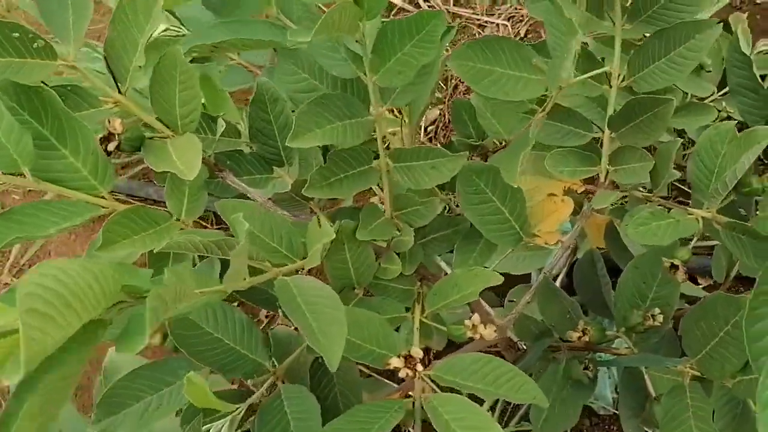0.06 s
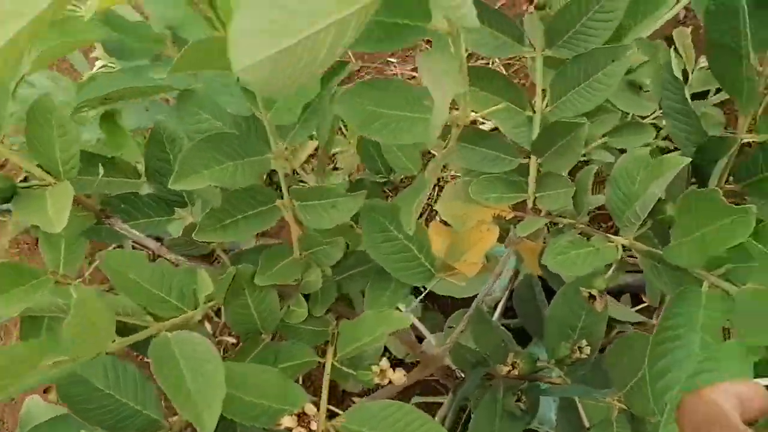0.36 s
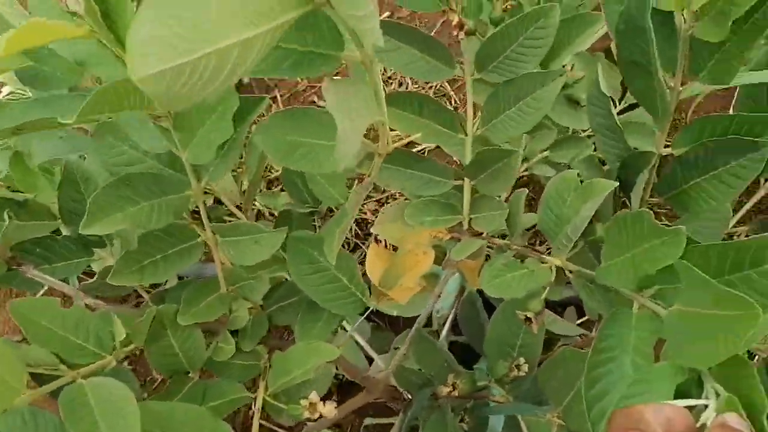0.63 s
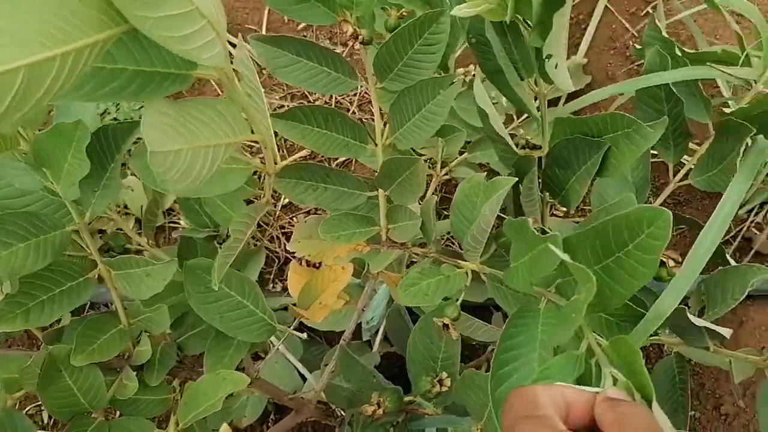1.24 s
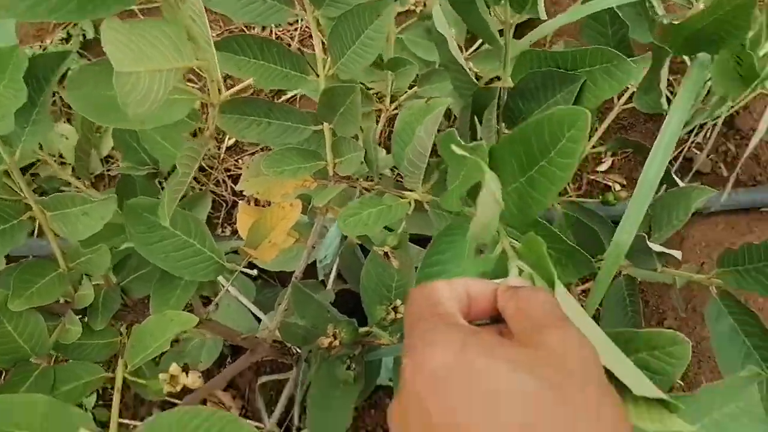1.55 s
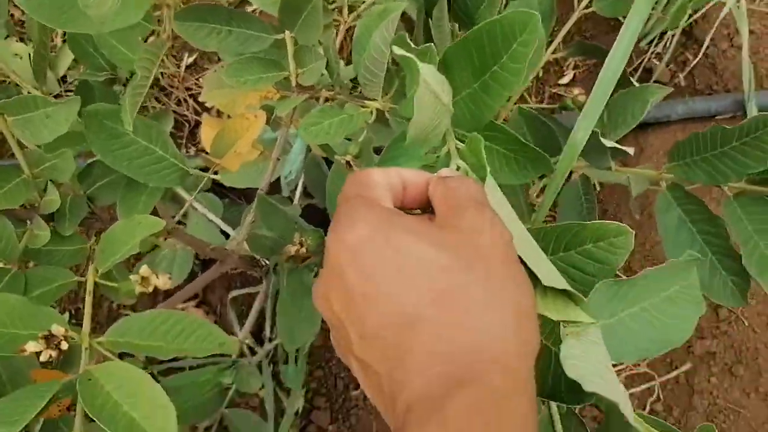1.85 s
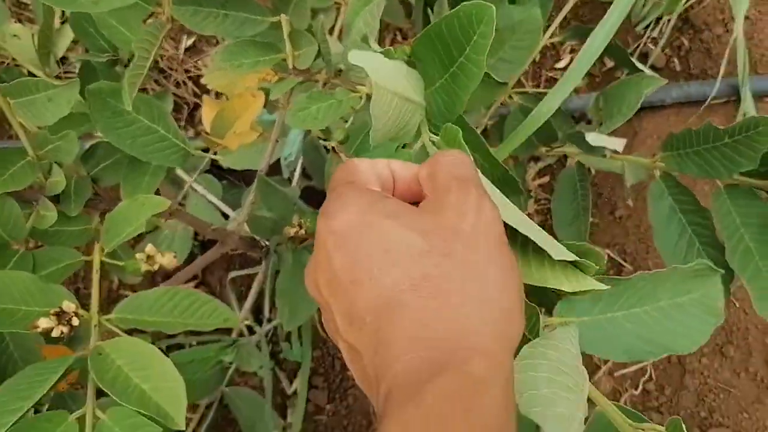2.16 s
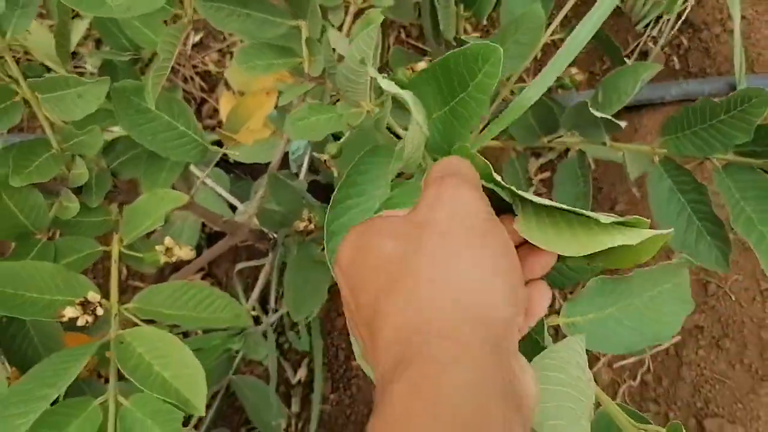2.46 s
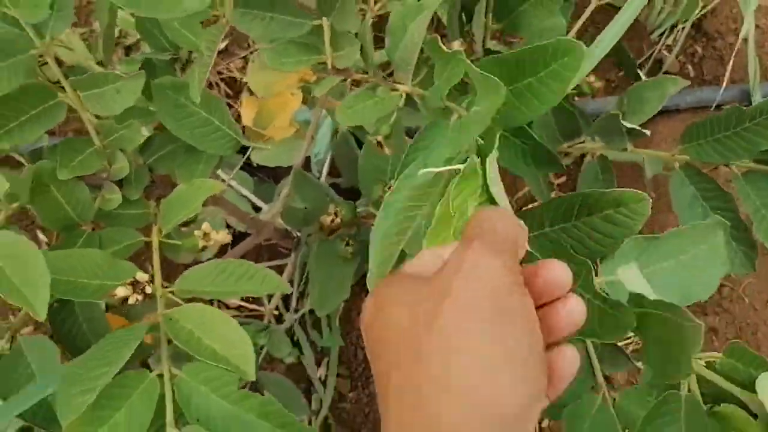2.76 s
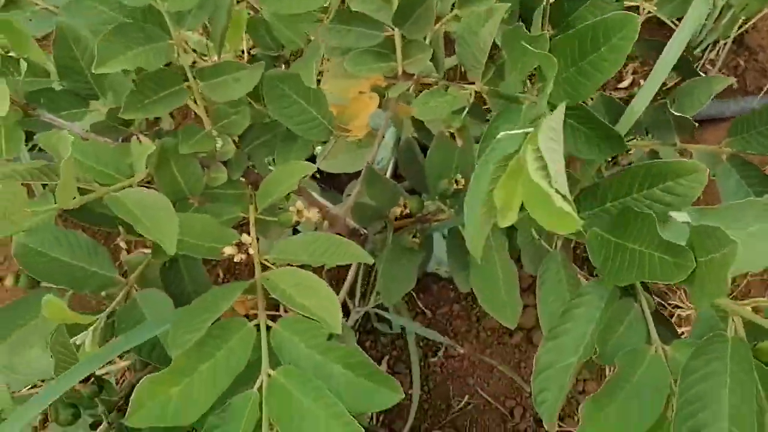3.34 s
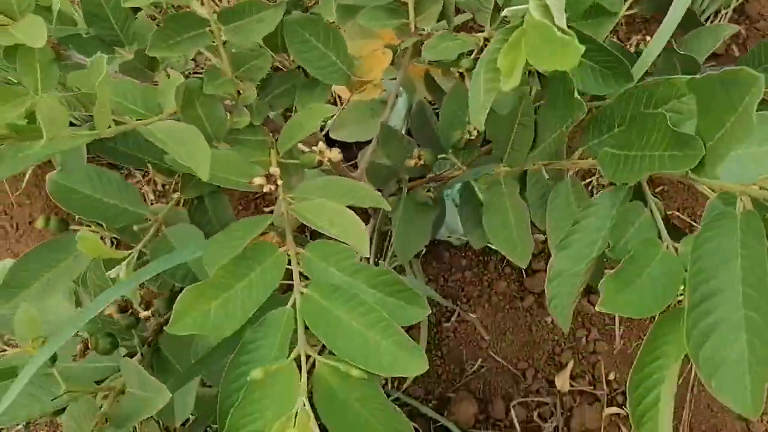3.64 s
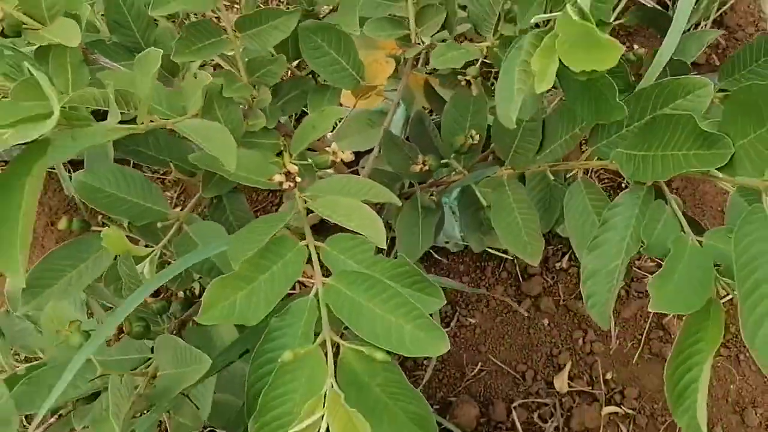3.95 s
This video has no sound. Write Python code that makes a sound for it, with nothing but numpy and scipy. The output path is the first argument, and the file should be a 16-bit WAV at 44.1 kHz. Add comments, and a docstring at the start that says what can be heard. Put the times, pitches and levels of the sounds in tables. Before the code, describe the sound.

Low wind buffeting and popping, with light leaf rustle and one sharp stem snap.

```python
"""From the start a breeze sweeps eddies over the two ports of a hand-held microphone, which rumble and
pop; faint far calls, probably birds, come and go in the soft hiss of a field. From about 1 s a hand
slides into a shrub, and the leaves rub and tick. At 2.6 s a bent shoot snaps and its fibres tear.
The branch then rustles back and settles with two soft swishes as the breeze slackens."""
import sys
import numpy as np
from scipy import signal
from scipy.fft import rfft, irfft
from scipy.io import wavfile
from scipy.ndimage import uniform_filter1d, map_coordinates

SR = 44100
rng = np.random.default_rng(int(sys.argv[2]) if len(sys.argv) > 2 else 0)


def to_wav(sig):
    """Store sig (one row per channel, or 1-D mono) as 16-bit WAV at the path in sys.argv[1].

    Samples outside -1..1 are clipped; the rate is SR.
    """
    pcm = np.clip(np.atleast_2d(sig), -1, 1) * 32767
    pcm = np.round(pcm).astype(np.int16)
    wavfile.write(sys.argv[1], SR, pcm.T)  # frames by channels


N = 176400

# gusts at each port (time [s], strength [dB])
GUST_LEFT = [(0.0, -39), (0.045, -25), (0.08, -46), (0.15, -35), (0.2, -34), (0.25, -52.5), (0.39, -34),
             (0.45, -39), (0.55, -36), (0.58, -19), (0.62, -32.5), (0.655, -24.5), (0.69, -36.5),
             (0.82, -26.5), (0.87, -27.5), (0.9, -43), (1.06, -46), (1.1, -33), (1.15, -38.5),
             (1.21, -28.5), (1.24, -47.5), (1.29, -23), (1.34, -38), (1.41, -19.5), (1.48, -46.5),
             (1.555, -30.5), (1.68, -56.5), (1.81, -39.5), (2.2, -53), (2.45, -39), (2.6, -52), (2.7, -34),
             (2.76, -53), (2.91, -68), (3.5, -75.5), (4.0, -67)]
GUST_RIGHT = [(0.0, -26), (0.12, -35), (0.165, -24), (0.3, -40), (0.33, -60.5), (0.4, -24), (0.44, -22),
              (0.47, -34.5), (0.5, -24), (0.525, -36.5), (0.585, -22), (0.63, -42), (0.71, -34.5),
              (0.738, -17), (0.765, -30), (0.805, -29), (0.84, -47), (0.96, -45.5), (0.99, -28),
              (1.03, -49), (1.06, -33), (1.12, -47), (1.2, -48), (1.22, -32), (1.26, -39), (1.345, -23),
              (1.44, -70), (1.53, -66.5), (1.57, -27.5), (1.6, -31), (1.69, -26), (1.75, -46), (1.89, -33),
              (1.95, -41.5), (2.01, -22.5), (2.06, -36.5), (2.26, -41.5), (2.3, -25.5), (2.36, -30),
              (2.385, -22), (2.41, -26), (2.49, -19.5), (2.52, -24), (2.615, -23), (2.69, -39.5),
              (2.78, -33), (2.83, -42), (2.935, -28), (3.0, -63), (3.075, -25), (3.22, -47.5), (3.34, -29),
              (3.49, -80), (3.64, -43.5), (3.75, -76.5), (3.82, -46.5), (3.93, -38), (4.0, -56)]
# mean flow (time [s], relative speed [ratio])
BREEZE_SPEED = [(2.65, 1), (3.1, .76)]
# eddy pressure at unit speed (frequency [Hz], relative level [dB])
EDDY_SPECTRUM = [(20, 3.5), (110, 3.5), (200, 3), (300, -2.5), (500, -16), (700, -29), (1000, -42.5),
                 (1500, -70.5), (3000, -86)]
def wind(gust, level_db, cut_hz):
    """Frozen turbulence: a stronger gust carries eddies past a port faster, so brighter and louder."""
    reference_db, db_per_doubling, loudness_exponent = -26, 21, 0.51
    flutter_db, flutter_hz = 1.5, 130
    lull_db, flaps_per_s = -9.5, 40
    strength_db = curve(gust) - reference_db + flutter_db * drift(flutter_hz)
    speed = curve(BREEZE_SPEED) * 2 ** (strength_db / db_per_doubling)
    # the flow breaks away in quick uneven flaps, with lulls between
    flap_hz = flaps_per_s * 2 ** np.tanh(drift(flutter_hz))
    lull = np.maximum(np.sin(2 * np.pi * np.cumsum(flap_hz) / SR), 0) ** 2
    eddies = unit_rms(colour(rng.standard_normal(N), EDDY_SPECTRUM))
    local_power = uniform_filter1d(uniform_filter1d(eddies ** 2, size=450), size=450)
    pressure = sweep(eddies / np.sqrt(local_power), speed)
    pressure *= unit_rms(gain(lull_db * lull)) * gain(level_db + loudness_exponent * strength_db)
    bass_cut = signal.butter(1, cut_hz, "high", fs=SR, output="sos")
    return signal.sosfilt(bass_cut, pressure)


# single sharp eddies (time [s], peak level [dB], centre frequency [Hz], port [left or right])
VORTICES = [(0.042, -11.5, 300, "left"), (0.22, -21.5, 396, "right"), (.402, -15, 330, "right"),
            (0.59, -16.5, 650, "left"), (0.771, -19, 320, "right"), (0.814, -9, 230, "left"),
            (.86, -14, 410, "left"), (1.021, -31, 410, "left"), (1.342, -24.5, 605, "right"),
            (1.427, -25, 430, "left"), (1.7, -21, 390, "right"), (2.463, -17.5, 397, "right"),
            (2.657, -12, 280, "right"), (2.751, -16.5, 253, "right")]
def vortex_pops():
    """Pressure drop in a vortex: its core pulls a brief suction pulse from the port it crosses."""
    t, out = np.arange(N) / SR, np.zeros((2, N))
    for time, db, hz, port in VORTICES:
        radius_squared = (np.pi * hz * (t - time)) ** 2
        pulse = (2 * radius_squared - 1) * np.exp(-radius_squared)
        out[["left", "right"].index(port)] += gain(db) * pulse
    return out


# cracks of stem and leaf stalks (time [s], relative level [dB], decay [s], left minus right [dB])
CRACKS = [(1.5483, -46.5, 0.0016, 6), (1.9649, -38.5, 0.001, -16), (2.6174, -29, 0.0023, -6),
          (2.643, -36, 0.0011, 3), (2.693, -42.5, 0.0029, 0), (3.008, -44, 0.001, 3),
          (3.857, -45, 0.0011, -6)]
# breaking green wood (frequency [Hz], gain [dB])
STEM_SPECTRUM = [(600, -20), (1700, -4), (2900, -4), (3900, -17), (5000, -6), (7200, 0), (8200, -7),
                 (9800, -13), (11200, -26), (15000, -30)]
def breaking_stem():
    """Fracture: stored strain is released in sudden cracks, and bark tears fibre by fibre."""
    burst = stereo(np.sign(rng.standard_normal((3, N))))
    cracks = burst * sum(gain(db) * decay(time, fall) * pan(side) for time, db, fall, side in CRACKS)
    tear_start_s, attack_s, decay_s = 2.623, 0.009, 0.028
    age = np.maximum(np.arange(N) / SR - tear_start_s, 0)
    pull = np.minimum(age / attack_s, 1) * np.exp(-np.maximum(age - attack_s, 0) / decay_s)
    fibres = grains(per_s=2000) * pull * gain(-42.5) * pan(-4.5)
    return 2 * colour(cracks + fibres, STEM_SPECTRUM)


# leaves rubbing (time [s], level [dB])
RUSTLE_LEVEL = [(0, -79.5), (.44, -67.5), (.55, -94.5), (1.03, -74), (1.09, -62.5), (1.19, -63),
                (1.265, -53.5), (1.36, -72), (1.56, -68), (1.72, -70.5), (1.76, -63), (1.8, -64),
                (1.92, -66), (2.03, -72.5), (2.61, -77.5), (2.66, -51.5), (2.73, -57), (3.03, -58.5),
                (3.1, -70), (4, -69)]
# leaf contacts (frequency [Hz], relative level [dB])
LEAF_SPECTRUM = [(700, -9), (1700, -2), (3000, 8), (4000, -6), (5400, 2.5), (7300, 5), (8300, -8),
                 (10000, -13), (11300, -18), (15000, -20)]
# the branch settling (centre time [s], length [s], frequency [Hz], level [dB])
SWISHES = [(3.25, 0.21, 4260, -68), (3.56, 0.17, 5180, -67)]
def rustling_leaves():
    """Stick-slip friction: leaves catch and slip in dense tiny contacts, then swish as they settle."""
    contacts = unit_rms(colour(grains(per_s=1900), LEAF_SPECTRUM))
    level_db = curve(RUSTLE_LEVEL) + 1.2 * drift(80)
    return (contacts * gain(level_db) + swells(SWISHES, width_hz=790)) * pan(-6)


# leaf tips striking each other (time [s], relative level [dB], resonance [Hz])
LEAF_FLICKS = [(1.071, -41, 2790), (1.9622, -46, 4900), (3.167, -37.5, 3430)]
def leaf_flicks():
    """Damped resonance: a struck leaf ticks with a short ring."""
    out = 0
    for time, db, hz in LEAF_FLICKS:
        tick = np.sign(rng.standard_normal(N)) * decay(time, decay_s=.003)
        out += gain(db) * resonate(tick, hz, q=7)
    return 4 * out * pan(-22)


# far calls (centre time [s], length [s], pitch [Hz], level [dB])
FAR_CALLS = [(.09, 0.15, 1830, -63.5), (0.991, 0.087, 2390, -61.5), (2.179, 0.15, 1894, -60.5),
             (3.25, 0.11, 2150, -59.5)]
def far_birds():
    """Narrow-band noise: faint far calls, probably birds, with a vague, slightly falling pitch."""
    return swells(FAR_CALLS, width_hz=320) * pan(-14)


# outdoor hiss (frequency [Hz], relative level [dB])
HISS_SPECTRUM = [(60, 21.5), (250, 9.5), (600, 1), (1300, -2.5), (2100, -1), (3100, -2), (4000, -12),
                 (5400, -6), (7200, -6.5), (8300, -18), (11000, -20), (15000, -21)]
# its slow swell (time [s], level [dB])
HISS_LEVEL = [(0, -58), (2.6, -56.5), (3.1, -53), (4, -54.5)]
def field_hiss():
    """Ambient noise: a soft broadband hiss, uncorrelated between the ports."""
    hiss = unit_rms(colour(rng.standard_normal((2, N)), HISS_SPECTRUM))
    return hiss * gain(curve(HISS_LEVEL)) * pan(-4)


def gain(db):
    """Amplitude ratio of a level in decibels."""
    return 10 ** (np.asarray(db) / 20)


def curve(rows):
    """Linear interpolation of (time [s], value) rows."""
    return np.interp(np.arange(N) / SR, *np.array(rows).T)


def unit_rms(x):
    """Normalisation to rms 1."""
    return x / np.sqrt(np.mean(x ** 2))


def pan(db):
    """Constant-power panning by a left-minus-right level difference."""
    return unit_rms(gain(np.array([[db], [-db]]) / 2))


def colour(x, spectrum):
    """Minimum-phase filtering through (frequency [Hz], gain [dB]) points."""
    hz, db = np.array(spectrum).T
    bin_db = np.interp(np.log(np.fft.rfftfreq(N, 1 / SR) + 1), np.log(hz), db)
    cepstrum = irfft(np.log(gain(bin_db)), N)
    cepstrum[1:N // 2] *= 2  # folding makes the filter causal
    cepstrum[N // 2 + 1:] = 0
    return irfft(rfft(x) * np.exp(rfft(cepstrum)), N)


def resonate(x, hz, q):
    """Two equal resonators in cascade."""
    b, a = signal.iirpeak(hz, q, fs=SR)
    return signal.lfilter(b, a, signal.lfilter(b, a, x))


def sweep(x, speed):
    """Time scaling: every frequency is multiplied by the speed."""
    return map_coordinates(x, [np.cumsum(speed)], mode="mirror")


def drift(rate_hz):
    """Smooth random modulation of rms 1."""
    hold = int(SR / rate_hz)
    steps = np.repeat(rng.standard_normal(N // hold + 1), hold)
    return unit_rms(uniform_filter1d(steps, hold)[:N])


def stereo(streams, shared=.3):
    """Partial coherence: the first of three streams is common to both channels."""
    return np.sqrt(shared) * streams[0] + np.sqrt(1 - shared) * streams[1:]


def grains(per_s, spread_db=3):
    """Shot noise in stereo: random impulses, most weak and a few strong."""
    size = gain(spread_db * np.minimum(rng.exponential(size=(3, N)), 5))
    hits = rng.random((3, N)) < per_s / SR
    return stereo(unit_rms(hits * size * np.sign(rng.standard_normal((3, N)))))


def decay(start, decay_s):
    """Exponential decay from a sudden onset."""
    age = np.arange(N) / SR - start
    return (age >= 0) * np.exp(-np.abs(age) / decay_s)


def swells(rows, width_hz, sag_per_s=.4):
    """Gaussian envelopes on narrow noise bands that sag in pitch."""
    t, out = np.arange(N) / SR, 0
    for centre, length, hz, db in rows:
        band = unit_rms(resonate(rng.standard_normal(N), hz, q=hz / width_hz))
        sagging = sweep(band, speed=np.exp(sag_per_s * (centre - t)))
        out += gain(db) * np.exp(-2 * ((t - centre) / length) ** 2) * sagging
    return out


def scene():
    """Superposition: each port has its own wind; the shrub and the field reach both."""
    left = wind(GUST_LEFT, level_db=-20.5, cut_hz=32)
    right = wind(GUST_RIGHT, level_db=-15.5, cut_hz=88)
    shrub = rustling_leaves() + breaking_stem() + leaf_flicks()
    return np.array([left, right]) + vortex_pops() + shrub + far_birds() + field_hiss()


def record(dry):
    """Band limiting: a steep low-pass removes the treble above 15.6 kHz."""
    return signal.sosfilt(signal.ellip(8, .2, 70, 15600, fs=SR, output="sos"), dry)


dry = scene()
out = record(dry)
to_wav(out)
```